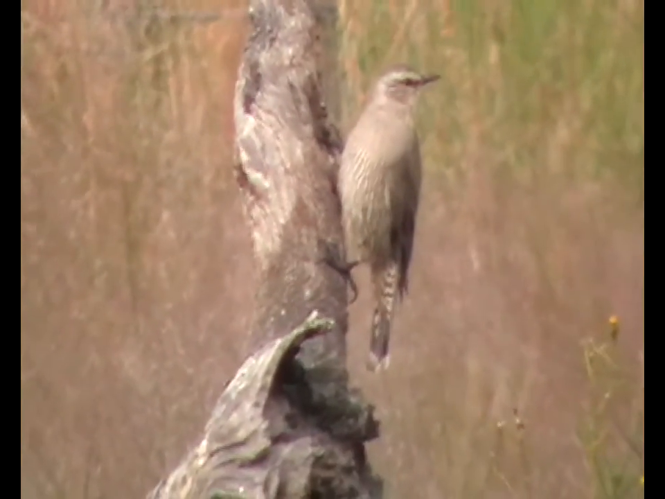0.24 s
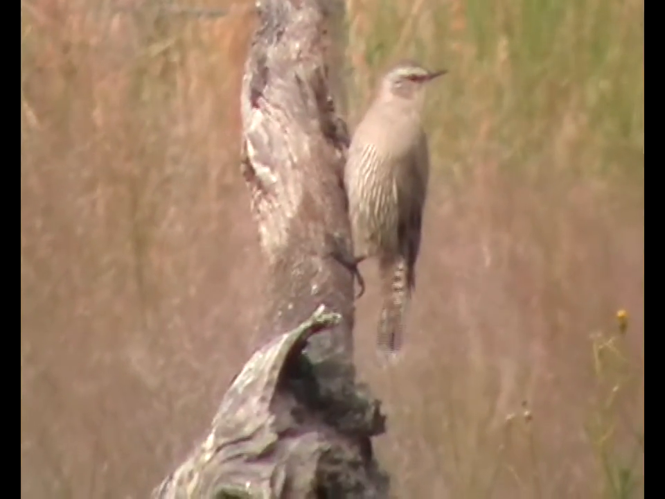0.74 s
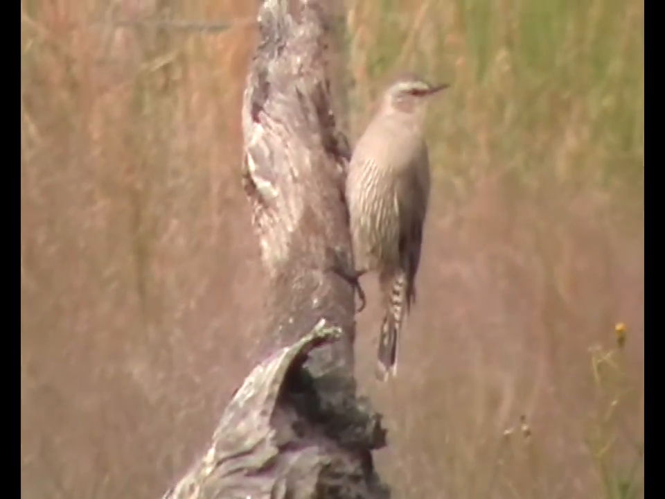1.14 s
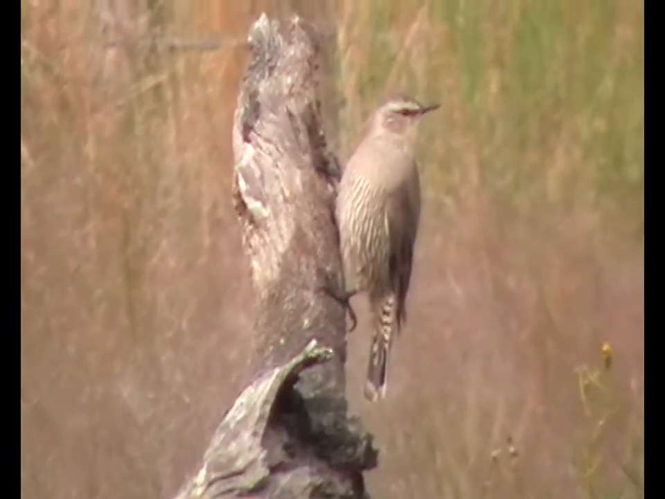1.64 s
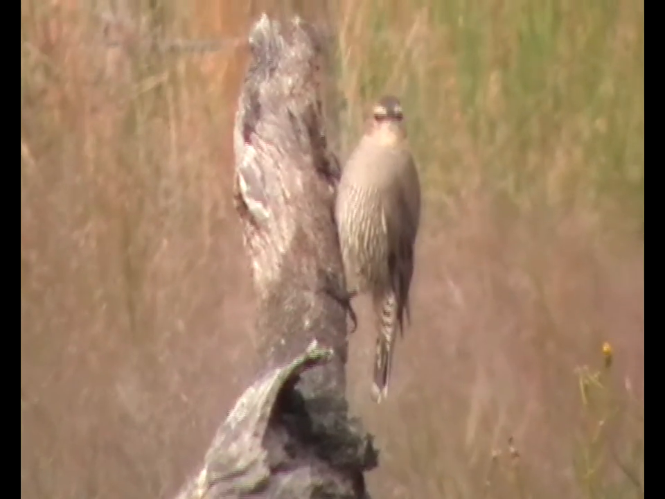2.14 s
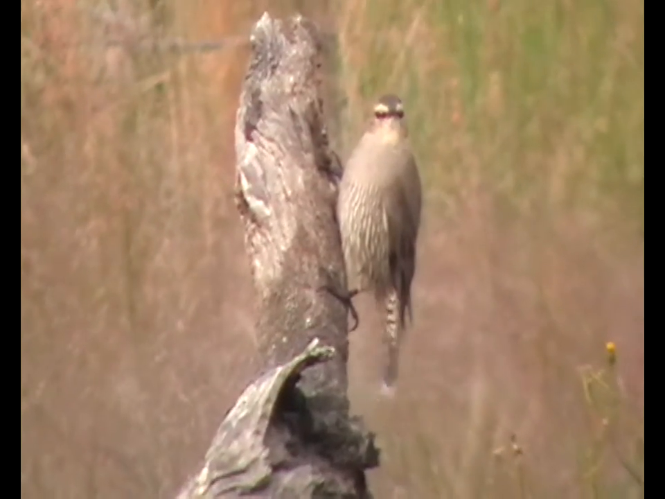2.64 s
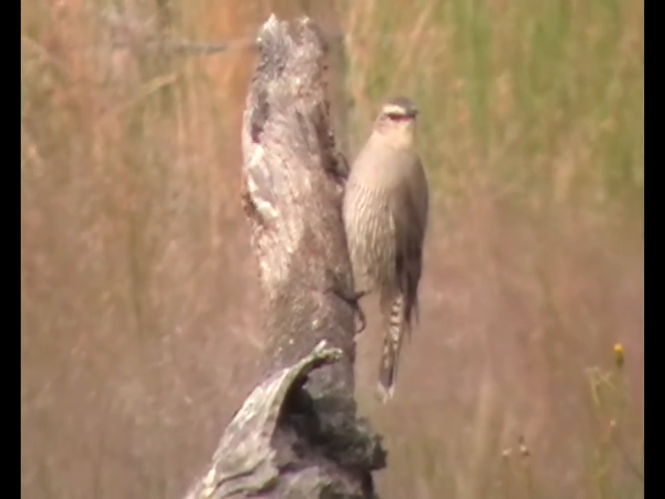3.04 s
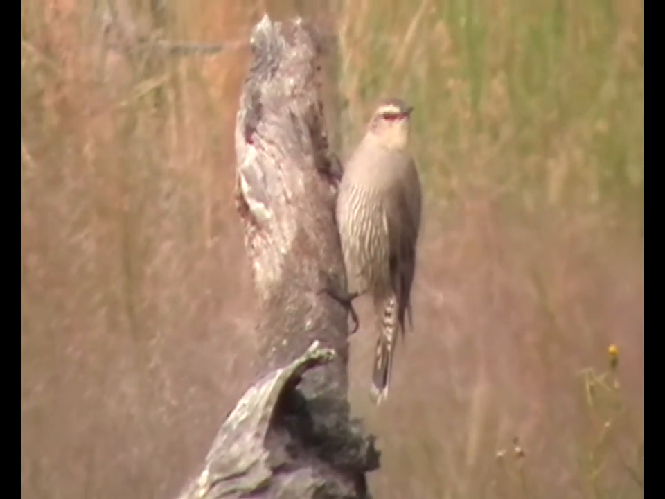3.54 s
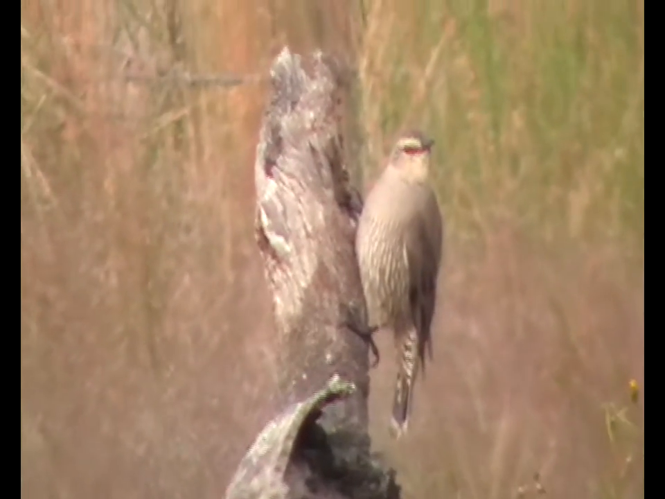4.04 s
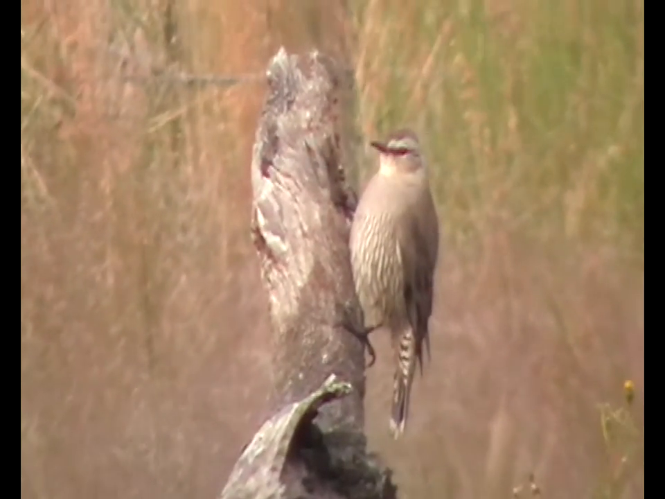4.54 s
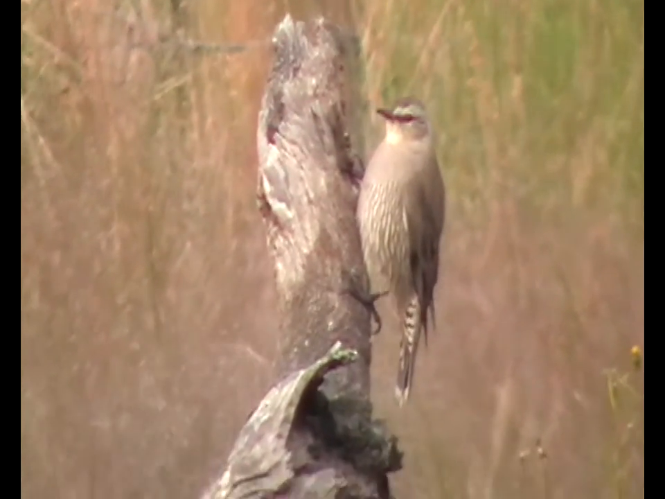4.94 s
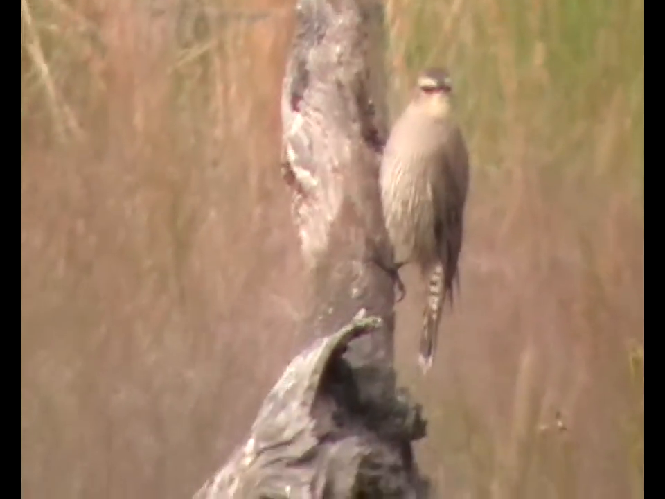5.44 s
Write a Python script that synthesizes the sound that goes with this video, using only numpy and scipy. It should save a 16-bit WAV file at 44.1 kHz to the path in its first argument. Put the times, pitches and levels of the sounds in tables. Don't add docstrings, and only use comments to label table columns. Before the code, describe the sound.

In open dry woodland, raspy squawks give way to a loud, rapidly repeated two-note whistle, with a dove and chattering bird farther off.

```python
import sys
import numpy as np
from scipy import signal
from scipy.fft import rfft, irfft, next_fast_len
from scipy.io import wavfile
from scipy.ndimage import uniform_filter1d

SR = 44100
rng = np.random.default_rng(int(sys.argv[2]) if len(sys.argv) > 2 else 0)


def magnitude_from_level(level_db):
    exponent = np.asarray(level_db, float) / 20
    return 10 ** exponent


def bounce(signal):
    frames = np.transpose(np.atleast_2d(signal))
    limited = np.clip(frames, -1, 1)
    pcm = np.round(limited * 32767).astype(np.int16)
    wavfile.write(sys.argv[1], SR, pcm)


N = 250929


def curve(rows):
    s, *columns = np.transpose(rows)
    first, last = int(s[0] * SR), min(int(s[-1] * SR), N)
    t = np.arange(first, last) / SR
    return first, [uniform_filter1d(np.interp(t, s, c), size=90, mode="nearest") for c in columns]


def at_hz(points, hz):
    point_hz, value = np.transpose(points)
    return np.interp(np.log(np.maximum(hz, 1)), np.log(point_hz), value)


def rms_one(x):
    return x / np.sqrt(np.mean(x ** 2) + 1e-20)


def coloured(x, gain_db_at):
    size = next_fast_len(len(x))
    gain = magnitude_from_level(gain_db_at(np.fft.rfftfreq(size, 1 / SR)))
    return rms_one(irfft(rfft(x, size) * gain, size)[:len(x)])


def brighten(x, db, hz):
    highs = signal.sosfilt(signal.butter(2, hz, "high", fs=SR, output="sos"), x)
    return x + (magnitude_from_level(db) - 1) * highs


def drift(count, rate_hz):
    settle = 8000
    r = np.exp(-2 * np.pi * rate_hz / SR)
    noise = rng.standard_normal(count + settle)
    return rms_one(signal.lfilter([1], [1, -2 * r, r * r], noise)[settle:])


def add(out, first, x, fade_s=0.0024):
    i = np.arange(len(x))
    ramp = np.minimum(i, i[::-1]) / (fade_s * SR)
    out[first:first + len(x)] += x * np.minimum(ramp, 1)


def syrinx(hz, level_at, count, flutter_db, flutter_hz=60):
    phase = 2 * np.pi * np.cumsum(hz) / SR + rng.uniform(0, 2 * np.pi)
    voice = 0
    for k in range(1, count + 1):
        level_db = level_at(k, k * hz) + flutter_db * drift(len(hz), flutter_hz)
        voice = voice + magnitude_from_level(level_db) * np.sin(k * phase + np.pi * k * k / 5)
    return voice


def background():
    # time in seconds, level in dB.
    air_level = [(0.0, -61), (0.89, -61.5), (2.69, -61.5), (3.01, -59.5), (3.33, -61), (3.84, -59.5),
                 (3.96, -60), (5.45, -58.5), (5.69, -57)]
    # frequency in Hz, level in dB per Hz.
    air_colour = [(18, -52.5), (50, -31), (96, -17.5), (185, -17), (313, -14), (387, -15), (656, -10),
                  (748, -11.5), (1080, -7.5), (1410, -10), (1650, -14), (1880, -15), (2650, -17),
                  (12900, -34), (16400, -46)]
    # frequency in Hz, level in dB rms.
    hum_tones = [(317.6, -68.5)]
    s, db = np.transpose(air_level)
    t = np.arange(N) / SR
    gusts = magnitude_from_level(np.interp(t, s, db) + 4.5 + .5 * drift(N, 6.7))
    out = gusts * coloured(rng.standard_normal(N), lambda f: at_hz(air_colour, f))
    for hz, level_db in hum_tones:
        out += magnitude_from_level(level_db + 2.5 + .7 * drift(N, 5)) * np.sin(2 * np.pi * hz * t)
    return out


def insects():
    # time in seconds, level in dB.
    chorus_level = [(0.0, -56), (0.62, -59), (1.18, -59.5), (1.32, -57.5), (2.13, -58), (2.47, -60.5),
                    (2.61, -57.5), (2.66, -64)]
    # frequency in Hz, level in dB per Hz.
    chorus_colour = [(1530, -39), (2600, -22), (2940, -4.5), (3290, 2), (3920, 2.5), (4480, 6.5),
                     (6010, -1.5), (6920, 2.5), (8020, -5.5), (9650, -18), (10700, -31), (12000, -48),
                     (15600, -61.5), (22000, -120)]
    stop_s, stop_fade_s = 2.632, 0.0041
    _, (db,) = curve(chorus_level)
    count = len(db)
    throb = magnitude_from_level(0.5 * drift(count, 90) + 0.22 * drift(count, 9.7))
    grains = throb * rng.standard_normal(count)
    stop = np.clip((stop_s - np.arange(count) / SR) / stop_fade_s, 0, 1)
    hiss = magnitude_from_level(db + 6.5) * stop * coloured(grains, lambda f: at_hz(chorus_colour, f))
    return np.pad(hiss, (0, N - count))


def haze():
    # time in seconds, level in dB rms.
    flock_level = [(4.2, -68), (4.6, -62.5), (5.0, -63.5), (5.4, -62), (5.69, -66)]
    out = np.zeros(N)
    first, (db,) = curve(flock_level)
    twitter = magnitude_from_level(3.6 * drift(len(db), 15)) * rng.standard_normal(len(db))
    band = coloured(twitter, lambda f: -40 * np.log2(np.maximum(f, 1) / 4700) ** 2)
    add(out, first, magnitude_from_level(db) * band)
    return out


def ticks():
    # start in seconds, peak in dB, centre in Hz, width in octaves, 60 dB decay in seconds.
    knocks = [(.031, -41, 11000, .9, .006), (.373, -38, 930, 1.4, .022), (.3735, -42, 1640, 0.41, 0.016),
              (1.029, -59, 11500, .4, .005), (1.2256, -33, 11500, .9, .004),
              (2.853, -41.5, 3400, 0.52, 0.057), (4.897, -19.5, 1340, 2.3, 0.0086),
              (4.8985, -19.5, 1540, 0.97, 0.043), (4.8995, -28.5, 7000, .8, .018),
              (4.9, -18, 1460, 2.14, 0.044), (5.275, -34.5, 630, 2.6, 0.02), (5.588, -53, 9000, 1.2, .006),
              (5.59, -39.5, 560, 3.4, 0.05), (5.629, -38.5, 8900, 1.1, 0.013)]
    out = np.zeros(N)
    count = 2000
    for s, peak_db, hz, octaves, t60 in knocks:
        burst = rng.standard_normal(count) * magnitude_from_level(-60 * np.arange(count) / SR / t60)
        edges = np.clip(hz * 2 ** (octaves * np.array([-.5, .5])), 50, .45 * SR)
        burst = signal.sosfilt(signal.butter(2, edges, "band", fs=SR, output="sos"), burst)
        add(out, int(s * SR), magnitude_from_level(peak_db) * burst / np.abs(burst).max(), fade_s=0.000067)
    return out


def dove_rows():
    # start in seconds, length in seconds, from Hz, to Hz, level in dB rms.
    coos = [
        (1.914, 0.13, 936, 900, -54),
        (2.025, 0.12, 1130, 1092, -47.5),
        (2.205, 0.033, 933, 926, -49.5),
        (2.221, .078, 1074, 991, -48),
        (3.904, .107, 925, 890, -55),
        (3.994, .143, 1080, 1033, -52.5),
        (4.185, 0.023, 918, 907, -52),
        (4.195, .08, 1024, 966, -50),
    ]
    edge_db, scoop, dip_db, swell_db = -10, 0.927, -3.5, 2.5
    out = []
    for s, length, a, b, db in coos:
        edge_s = min(.012, length / 3)
        out.append([(s, scoop * a, db + edge_db),
                    (s + edge_s, a, db),
                    (s + length / 2, (a + b) / 2, db + dip_db * length / 0.16),
                    (s + length - edge_s, b, db + swell_db),
                    (s + length, b, db + edge_db)])
    return out


def pipe_rows():
    # start in
    # seconds, length in seconds, from Hz, to Hz, level in dB rms.
    pipes = [(0, 0.071, 2640, 2540, -63.5), (1.454, .028, 3020, 2400, -63), (1.51, .027, 2300, 2000, -65),
             (1.645, 0.021, 2780, 2380, -60), (1.69, .022, 2250, 2050, -67),
             (1.712, 0.032, 2650, 3120, -63.5), (4.035, .016, 5900, 6880, -65),
             (4.053, 0.022, 6900, 5800, -65), (4.753, 0.036, 4500, 4280, -55.5),
             (4.995, .03, 4500, 3600, -57.5), (5.35, 0.18, 2150, 2030, -62.5), (5.57, .09, 4400, 4580, -65),
             (5.63, .05, 3720, 3090, -50)]
    peak_at, edge_db = 0.41, -4.5
    return [[(s, a, db + edge_db),
             (s + peak_at * length, a + peak_at * (b - a), db),
             (s + length, b, db + edge_db)] for s, length, a, b, db in pipes]


def far_birds():
    out = np.zeros(N)
    for rows in dove_rows() + pipe_rows():
        first, (hz, db) = curve(rows)
        tone = syrinx(hz, lambda k, _: 0, count=1, flutter_db=-0.5)
        add(out, first, magnitude_from_level(db + 6.5) * tone, fade_s=0.0028)
    return out


def warble_rows():
    # start in seconds, first centre in Hz, climb in Hz per turn, swing in Hz, level in dB.
    warbles = [
        (.583, 1162, -4, 126, -45.5),
        (3.503, 1286, 78.5, 211, -43),
    ]
    lead_hz, lead_s, turn_s, edge_db = 1620, .024, .0132, -8.5
    settle = .88
    k = np.arange(8)
    out = []
    for s, hz, climb, swing, db in warbles:
        turn_hz = hz + climb * k - swing * (-settle) ** k
        turns = np.c_[s + lead_s + .008 + turn_s * k, turn_hz, db - 1.5 * (-1) ** k]
        lead = [(s, lead_hz, db + edge_db), (s + 0.0067, lead_hz, db + .3), (s + lead_s, lead_hz, db)]
        out.append(np.r_[lead, turns, [turns[-1] + [turn_s, -swing, edge_db]]])
    return out


def sweep_rows():
    # start in seconds, length in seconds, from Hz, top Hz, level in dB.
    sweeps = [
        (0.787, 0.075, 1940, 2910, -50.5),
        (3.662, 0.078, 1620, 2790, -44),
        (3.737, .088, 2570, 2880, -42.5),
        (3.87, .075, 2000, 2790, -45.5),
        (4.02, 0.022, 2004, 2580, -45.5),
        (4.03, .089, 1950, 2804, -45.5),
    ]
    # start in seconds, length in seconds, from Hz, level in dB.
    drops = [
        (3.824, 0.033, 2900, -39.5),
        (3.95, 0.014, 2750, -43.5),
        (3.97, .022, 2750, -49.5),
        (4.111, 0.015, 2600, -49.5),
        (4.12, 0.019, 2750, -46.5),
    ]
    bend, attack_s, start_db, fade_db = 1.2, 0.016, -8.5, -2.5
    drop_to_hz, drop_bend, drop_fade_db = 1250, 1.4, -9
    u = np.linspace(0, 1, num=12)
    rise = (1 - np.exp(-bend * u)) / (1 - np.exp(-bend))
    out = []
    for s, length, low_hz, top_hz, db in sweeps:
        onset_db = start_db * np.maximum(1 - u * length / attack_s, 0)
        out.append(np.c_[s + u * length, low_hz + (top_hz - low_hz) * rise, db + onset_db + fade_db * u ** 2])
    for s, length, hz, db in drops:
        out.append(np.c_[s + u * length, hz + (drop_to_hz - hz) * u ** drop_bend, db + drop_fade_db * u ** 2])
    return out


def chatter_syllables():
    # frequency in Hz, gain in dB.
    chatter_throat = [(1000, -3), (1700, 3.5), (2600, 4.5), (3400, 12.5), (4400, 7.5), (5400, -0.5),
                      (6000, -13), (7500, -8.5), (9000, -20.5), (12000, -27)]
    out = np.zeros(N)
    for rows in warble_rows() + sweep_rows():
        first, (hz, db) = curve(rows)
        low = np.clip((2100 - hz) / 300, 0, 1)
        hz = hz * (1 + (0.0061 + 0.0084 * low) * drift(len(hz), 80))
        level_at = lambda k, f: at_hz(chatter_throat, f) - (1.5 + 0.69 * low) * k
        voice = syrinx(hz, level_at, count=4, flutter_db=3.5, flutter_hz=35)
        add(out, first, magnitude_from_level(db - 4 * low) * voice)
    return out


def chatter_rasps():
    # start in seconds, length in seconds, peak in dB rms, peak at share, brightness in dB.
    rasps = [
        (.415, 0.13, -43, 0.62, -6),
        (3.315, 0.13, -45, .78, -8),
        (3.5, .18, -42.5, .92, 4.5),
        (.15, 0.13, -53, .7, -11),
    ]
    # frequency in Hz, level in dB per Hz.
    rasp_throats = [
        [(700, -34), (1500, -6.5), (1950, -6), (2300, -5), (2800, 1), (3400, -7.5), (5300, -23), (6500, -32),
         (12000, -67)],
        [(700, -24), (1200, -2.5), (1600, -1.5), (1950, -3.5), (2500, 0), (3200, 0.5), (4200, -4.5),
         (5300, -12.5), (5900, -23.5), (8000, -30), (12000, -69)],
    ]
    attack, shape_db = 0.11, np.array([-14, -5, 0, -15.5])
    out = np.zeros(N)
    for i, (s, length, peak_db, at, top_db) in enumerate(rasps):
        throat = rasp_throats[min(i, 1)]
        first, (db,) = curve(np.c_[s + length * np.array([0, attack, at, 1]), peak_db + shape_db])
        puffs = magnitude_from_level(2.5 * drift(len(db), 120)) * rng.standard_normal(len(db))
        breath = coloured(puffs, lambda f: at_hz(throat, f))
        add(out, first, magnitude_from_level(db) * brighten(breath, top_db, hz=3600))
    return out


def chatterer():
    return chatter_syllables() + chatter_rasps()


def squawk_rows(s, length, db, attack, top_db):
    slack_hz, end_hz = 507.7, 547
    tense_hz = 572.2 + 11 * (db + 19)
    tense_at, hold_to = .42, 0.76
    caught_db = db - 3.5
    bright_db, dull_db = 5.5, -12.5
    return [(s, slack_hz, caught_db - 13 * min(attack / 0.016, 1), top_db),
            (s + attack, slack_hz, caught_db, top_db + bright_db),
            (s + tense_at * length, tense_hz, db, top_db + .3 * bright_db),
            (s + hold_to * length, tense_hz + 22, db - 1.5, top_db + dull_db),
            (s + length, end_hz, db - 19, top_db + .7 * dull_db)]


def squawker():
    # start in seconds, length in seconds, peak in dB rms, attack in seconds, brightness in dB.
    squawks = [
        (.658, 0.094, -18.5, .024, -2.5),
        (.832, 0.078, -18.5, .011, -1.5),
        (1.026, 0.091, -19, .014, 1),
        (1.2256, 0.061, -19.5, 0.00041, 0),
        (1.913, .083, -21, .022, 3.5),
        (2.184, 0.081, -20, .014, 2.5),
    ]
    # frequency in Hz, gain in dB.
    squawk_throat = [(500, -44), (1050, -31), (1620, -33.5), (2330, -38), (2900, -28), (3300, -8),
                     (3800, -3.5), (4680, 3), (5300, -3), (6000, -14.5), (6800, -20.5), (9000, -45),
                     (10200, -55.5), (12000, -95.5)]
    roughness = [(0, .9), (.2, .6), (.45, .36), (.75, .38), (1, .7)]
    out = np.zeros(N)
    for squawk in squawks:
        first, (hz, db, top_db) = curve(squawk_rows(*squawk))
        rough = np.interp(np.linspace(0, 1, len(hz)), *np.transpose(roughness))
        hz = hz * (1 + .03 * np.sqrt(rough) * drift(len(hz), 80))
        voiced = rms_one(syrinx(hz, lambda k, f: at_hz(squawk_throat, f), count=18, flutter_db=2.2))
        breath = coloured(rng.standard_normal(len(hz)), lambda f: at_hz(squawk_throat, f))
        breath = brighten(breath, 5, hz=5600)
        call = brighten(np.sqrt(1 - rough ** 2) * voiced + rough * breath, top_db, hz=5560)
        power = uniform_filter1d(uniform_filter1d(call ** 2, size=130), size=130)
        add(out, first, magnitude_from_level(db + 0.25) * call / np.sqrt(power), fade_s=0.00068)
    return out


def whistler():
    # share of the note, pitch against top pitch, level in dB.
    rise_shape = [(0, .915, -23.5), (.08, .925, -10.5), (.25, 0.93, -8), (.43, 0.97, -1), (.68, 1, -1.5),
                  (.84, .996, -6), (.94, 0.96, -9.5), (1, .93, -25.5)]
    flick_shape = [(0, 1.17, -27.5), (.08, 1.06, -5), (.13, 1, 1), (.22, .92, -5.5), (.38, .86, -6.5),
                   (.6, .8, -12.5), (.8, .76, -17), (1, 0.722, -23.5)]
    # start in seconds, length in seconds, pitch in Hz, peak in dB, lean of the peak -1 to 1.
    rise_notes = [(3.744, 0.048, 3500, -9, 0.91), (3.963, .052, 3577, -8, -0.37),
                  (4.181, 0.053, 3494, -10, -0.22), (4.393, 0.055, 3498, -9, -0.1),
                  (4.609, 0.052, 3497, -9.5, -0.11), (4.819, .054, 3480, -9.5, -0.16),
                  (5.042, 0.054, 3471, -10, 0.074), (5.272, 0.049, 3444, -9.5, 0.35)]
    flick_notes = [(3.827, 0.05, 3440, -14, .05), (4.043, 0.058, 3446, -15.5, 0.25),
                   (4.262, 0.052, 3384, -13, .05), (4.473, 0.051, 3498, -11, .05),
                   (4.692, 0.045, 3470, -10.5, .05), (4.904, .048, 3445, -11, .05),
                   (5.12, 0.052, 3402, -12, .05), (5.355, 0.049, 3437, -13, .05)]
    # frequency in Hz, level in dB below the peak.
    overtones = [(5000, -43.5), (6500, -37.5), (7100, -45), (7500, -53), (8000, -45), (9000, -62.5),
                 (10500, -69)]
    out = np.zeros(N)
    for shape, notes in ((rise_shape, rise_notes), (flick_shape, flick_notes)):
        share, pitch, db = np.transpose(shape)
        for s, length, hz, peak_db, lean in notes:
            first, (note_hz, u) = curve(np.c_[s + share * length, pitch * hz, share])
            swell_db = np.interp(u - lean * u * (1 - u), share, db)

            def level_at(k, f):
                if k == 1:
                    return swell_db
                return 0.37 * swell_db + 4.3 * drift(len(f), 40) + at_hz(overtones, f)

            add(out, first, magnitude_from_level(peak_db) * syrinx(note_hz, level_at, count=3, flutter_db=.3))
    return out


def woodland(x):
    # level in dB, 60 dB decay in seconds, delay in seconds.
    scatter = [
        (-19, .14, .016),
        (-19, .7, .035),
    ]
    t, echoes = np.arange(SR) / SR, 0
    for level_db, t60, delay in scatter:
        tail = rng.standard_normal(SR) * magnitude_from_level(-60 * (t - delay) / t60) * np.clip(t / delay - .5, 0, 1)
        echoes = echoes + magnitude_from_level(level_db) * tail / np.sqrt(np.sum(tail ** 2))
    echoes[int(.033 * SR)] += magnitude_from_level(-17)
    echoes[int(.0065 * SR)] += magnitude_from_level(-12.5)
    echoes = signal.sosfilt(signal.butter(1, 7000, fs=SR, output="sos"), echoes)
    return signal.fftconvolve(x, echoes)[:N]


def scene():
    near = whistler() + squawker()
    far = chatterer() + far_birds()
    birds = near + magnitude_from_level(-2) * far + woodland(near + magnitude_from_level(2.5) * far)
    return (birds + haze() + ticks() + insects() + background())[None]


def low_pass(x):
    return signal.sosfilt(signal.butter(12, 16500, fs=SR, output="sos"), x)


def record(dry):
    # frequency in Hz, gain in dB.
    microphone = [(20, -4), (60, 1), (9000, 0.5), (12000, -4.5), (15000, -7), (15700, -7.5), (16500, -19.5)]
    size = next_fast_len(N)
    gain = magnitude_from_level(at_hz(microphone, np.fft.rfftfreq(size, 1 / SR)))
    heard = irfft(rfft(dry, size) * gain, size)[:, :N]
    return low_pass(heard)


dry = scene()
out = record(dry)
bounce(out)
```